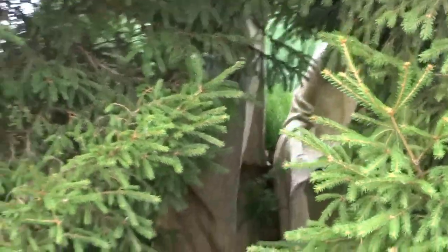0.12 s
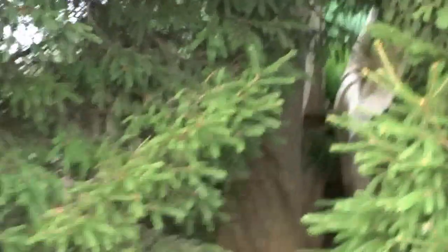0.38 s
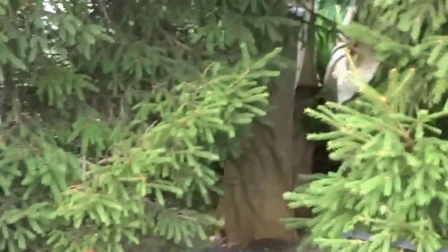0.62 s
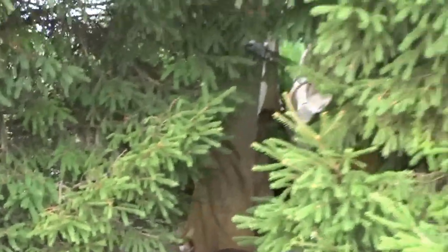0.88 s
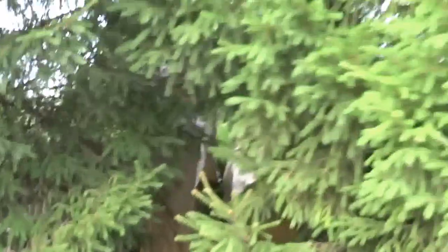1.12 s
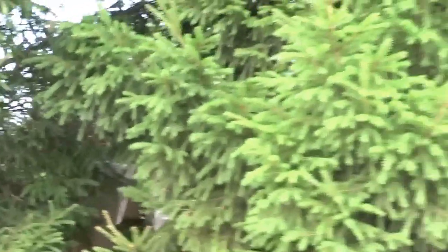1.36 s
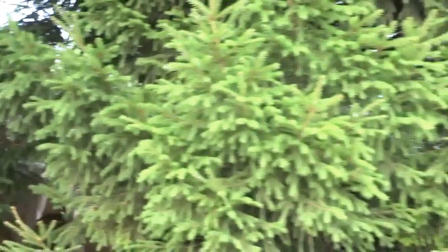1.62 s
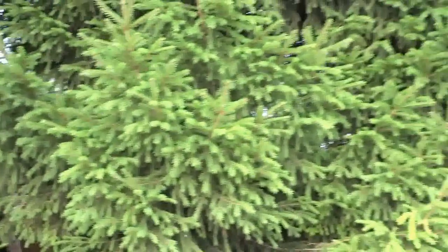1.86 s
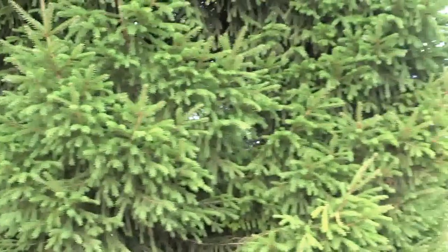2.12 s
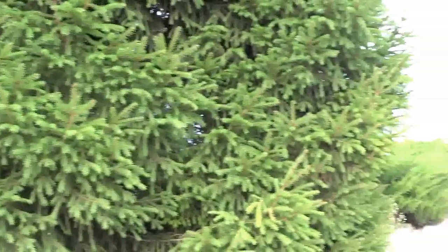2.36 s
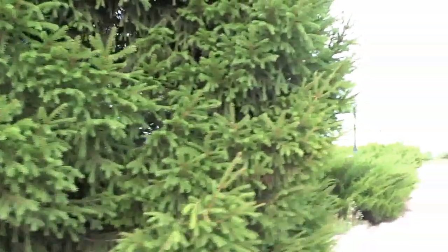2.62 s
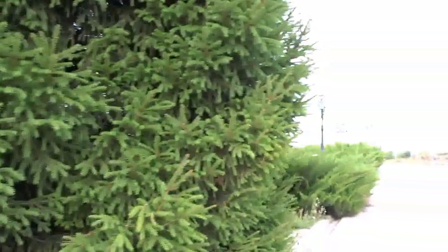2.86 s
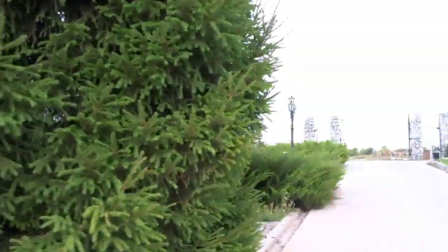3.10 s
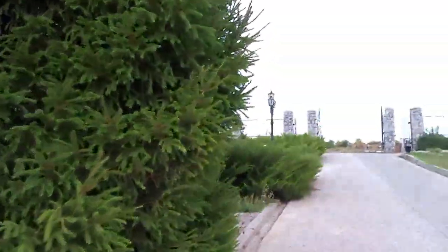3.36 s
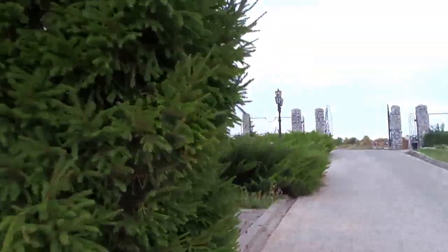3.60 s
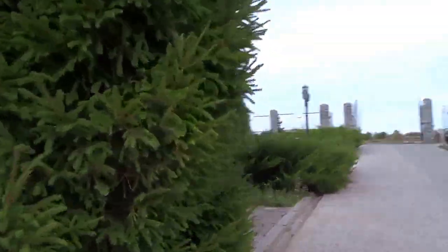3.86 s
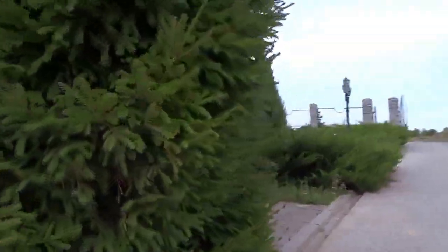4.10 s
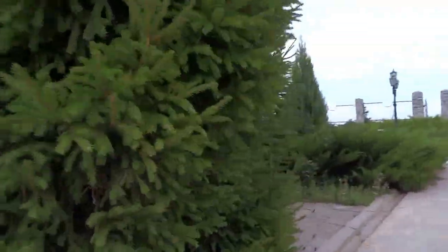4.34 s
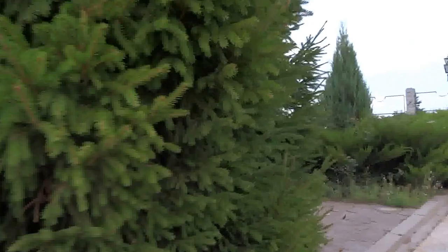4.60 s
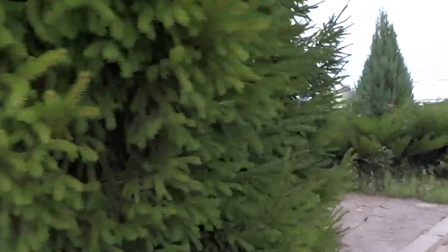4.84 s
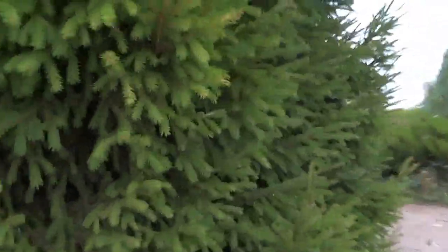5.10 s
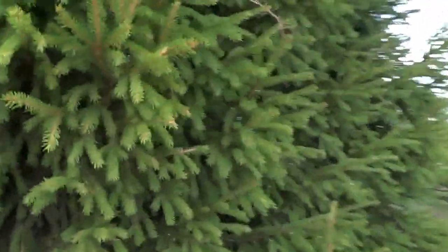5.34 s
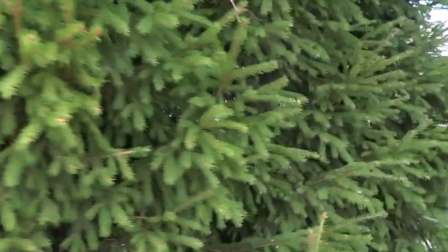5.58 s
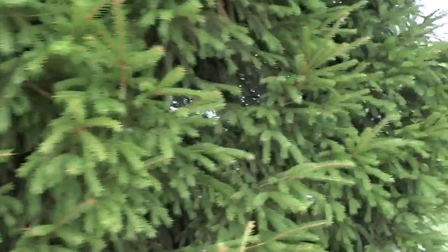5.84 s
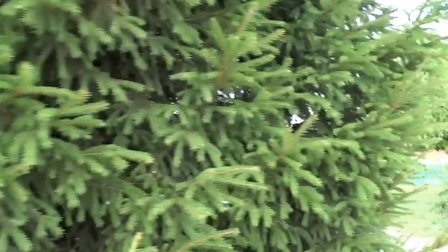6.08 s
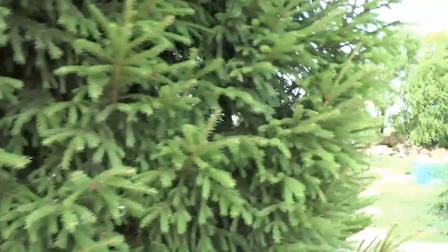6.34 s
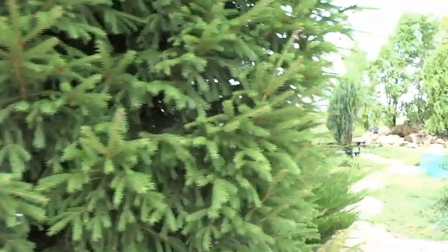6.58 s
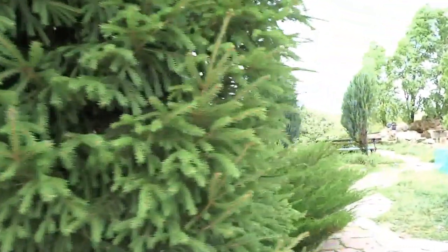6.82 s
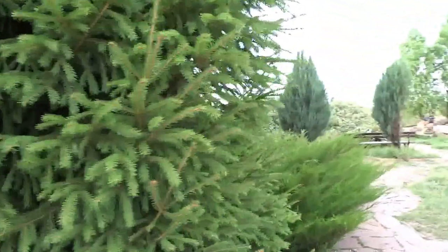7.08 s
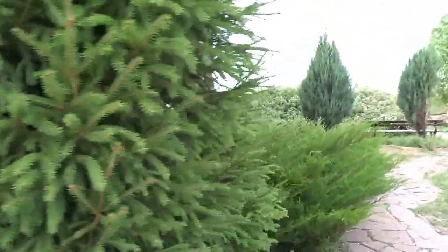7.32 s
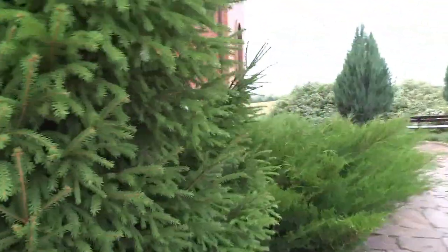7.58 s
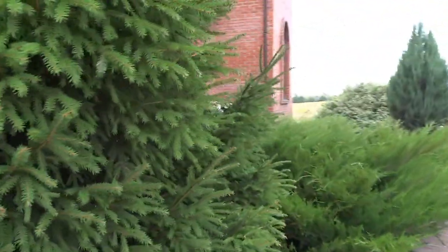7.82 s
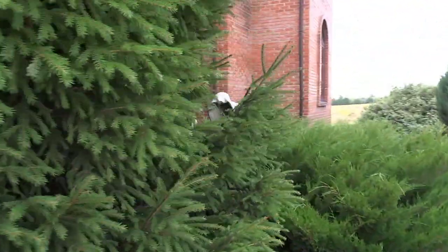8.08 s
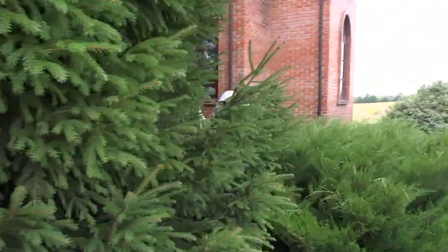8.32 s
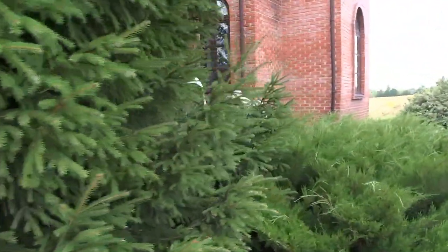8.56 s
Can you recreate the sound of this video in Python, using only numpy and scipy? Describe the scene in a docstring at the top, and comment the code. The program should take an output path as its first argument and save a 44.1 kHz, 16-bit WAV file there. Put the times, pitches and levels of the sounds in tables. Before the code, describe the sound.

Bursts of crisp needle rustling, scraping twigs and small wooden snaps, with lively sparrow chirping around and a barely audible distant engine hum.

```python
"""Among spruce trees, someone pushes past the branches with a small camera in hand.
Needles swish and twigs scrape as filtered noise and grains; boughs creak low; snaps are short ringing bursts.
Sparrows chatter as gliding tones, some near and clear, the rest a blur of overlapping notes.
Light wind buffets the microphone, mostly at first, as swells of low noise.
A far engine hums as three faint wavering tones."""
import sys
import numpy as np
from scipy import signal
from scipy.fft import rfft, irfft, next_fast_len
from scipy.io import wavfile
from scipy.ndimage import uniform_filter1d

SR = 44100
rng = np.random.default_rng(int(sys.argv[2]) if len(sys.argv) > 2 else 0)


def materialize(psi):
    """Save the field psi as 16-bit PCM at rate SR to the path in sys.argv[1].

    A 1-D psi becomes a single channel; in a 2-D psi each row is a channel.
    """
    bounded = np.clip(np.atleast_2d(psi).T, -1, 1)
    quanta = np.round(bounded * 32767).astype(np.int16)
    wavfile.write(sys.argv[1], SR, quanta)


def volts_from_db(level):
    """Convert decibel levels to linear amplitude ratios."""
    exponent = np.asarray(level, float) / 20
    return 10 ** exponent


N = 383095
T = np.arange(N) / SR


def on_log(table, hz, axis=1):
    """Reads a column of a table of frequencies on a log-frequency axis."""
    table = np.array(table, float)
    return np.interp(np.log(np.maximum(hz, 1)), np.log(table[:, 0]), table[:, axis])


def colour(x, table):
    """Causal filter with the table's spectrum, built from the cepstrum of the log gain."""
    gain_db = on_log(table, np.linspace(0, SR / 2, 1025))
    cepstrum = irfft(np.log(volts_from_db(gain_db)))
    # fold the second half onto the first: minimum phase
    cepstrum[1:1024] *= 2
    cepstrum[1025:] = 0
    impulse = irfft(np.exp(rfft(cepstrum)))
    return signal.fftconvolve(x, impulse)[:N]


def band(x, lo_hz, hi_hz):
    """Band-pass with gentle slopes."""
    edges = [lo_hz, min(hi_hz, .45 * SR)]
    return signal.sosfilt(signal.butter(2, edges, "bandpass", fs=SR, output="sos"), x)


def unit(x, lo_hz, hi_hz):
    """Scales x so that the given band has rms 1."""
    return x / np.std(band(x, lo_hz, hi_hz))


def walk(rate):
    """Random levels held about 1 / rate s and slewed twice; spread near 1."""
    hold = max(int(SR / rate / 32), 2)  # in steps of 32 samples
    slow = np.repeat(rng.standard_normal(N // 32 // hold + 2), hold)
    slow = uniform_filter1d(uniform_filter1d(slow, hold), hold)
    return 1.49 * np.interp(np.arange(N) / 32, np.arange(len(slow)), slow)


def swells(rows, steady_db, axis=2):
    """Level in dB of a steady bed plus swells that climb to a peak and fall away; powers add."""
    rise_share = 0.8  # a swell rises in this share of the time it takes to fall
    roundness = 0.99  # 1 = pointed peak with long skirts, 2 = dome with abrupt ends
    rows, t = np.array(rows, float), T[::32]
    late = t - rows[:, :1]
    distance = np.where(late > 0, late, -late / rise_share)
    fall_s = np.maximum(rows[:, 1:2] / 1000, .01)
    db = rows[:, axis, None] - 10 * (distance / fall_s) ** roundness
    power = volts_from_db(2 * (steady_db + 0 * T))[::32] + volts_from_db(2 * db).sum(axis=0)
    return np.interp(T, t, 10 * np.log10(power))


def grains(rate, spread_db, tail_s):
    """Noise in short bursts: sudden starts of very uneven size that die away."""
    size = volts_from_db(spread_db * np.minimum(rng.exponential(size=N), 3.3))
    starts = (rng.random(N) < rate / SR) * size
    envelope = signal.lfilter([1], [1, -np.exp(-1 / (tail_s * SR))], starts)
    return envelope * rng.standard_normal(N)


def flutter(x, depth_db, rate):
    """Each half octave wavers on its own, as different sprigs bend and let go."""
    size = 2 * next_fast_len(N // 2 + 1)
    spec = rfft(x, size)
    half_octave = np.clip(2 * np.log2(np.fft.rfftfreq(size, 1 / SR) + 1), 15, 28)
    out = np.zeros(N)
    for k in range(15, 29):
        share = np.clip(1 - abs(half_octave - k), 0, 1)
        out += irfft(spec * share)[:N] * volts_from_db(depth_db * walk(rate))
    return out


def add(out, s, x):
    """Mixes x into out at time s."""
    i = min(max(int(s * SR), 0), N)
    out[i:i + len(x)] += x[:N - i]


def echoes(x, t60, wet_db):
    """Trunks and walls scatter the sound into a short diffuse tail."""
    t = np.arange(int(.4 * SR)) / SR
    tail = rng.standard_normal(len(t)) * np.exp(-np.log(1000) * t / t60) * (t > .004)
    return x + volts_from_db(wet_db) * signal.fftconvolve(x, tail / np.linalg.norm(tail))[:N]


# how firmly the walker leans into the foliage and turns the camera:
# [t/s, level/dB added to the steady rustle, left minus right level/dB]
LEANING = [(0, 1, -.4), (.6, -1, 0), (1.1, 2.5, -.7), (2.0, -1.5, 1), (2.8, 4.5, -0.8), (3.3, 2, 0.6),
           (4.15, -0.5, 0.7), (4.6, 1, -0.3), (5.5, -2, 0.4), (6.2, -0.5, 0.2), (7.3, -0.5, 0.3),
           (7.9, -3, -0.4), (8.68, -1.5, -1.5)]


def leaning():
    """The walker's moving body: rustle level and left-right balance, both in dB over time."""
    t, lean_db, turn_db = np.transpose(LEANING)
    return np.interp(T, t, lean_db), np.interp(T, t, turn_db)


# spectrum of needles: [f/Hz, level/dB]
NEEDLE_SPECTRUM = [(1500, -43), (2200, -14), (3500, -6), (4400, -12.5), (5500, -7), (6400, -2.5),
                   (7500, -1.5), (8600, -5.5), (10200, -17), (12800, -36), (15700, -41)]
# spectrum of twigs: [f/Hz, level/dB]
TWIG_SPECTRUM = [(350, -33), (600, -8), (1040, -4.5), (1300, 2), (1550, -3), (2100, -1.5), (3300, 2),
                 (5000, -9), (7000, -22), (12000, -114)]
# branches brushed aside, before the strokes waver: [t/s of the peak, time/ms to fall 10 dB,
# needle swish level/dB at 6.5-12 kHz before extra treble, twig scrape level/dB at 0.6-2.2 kHz]
BRUSHED_BRANCHES = [(.11, 138, -42, -78), (.24, 45, -43.5, -78), (1.0, 123, -42.5, -88),
                    (2.3, 70, -68, -84), (2.52, 90, -38.5, -75), (2.665, 52, -32, -46.5),
                    (2.93, 7, -40.5, -45), (3.022, 13.5, -29, -29), (3.06, 84, -44, -41),
                    (4.42, 134, -47, -62), (4.56, 47, -34.5, -50), (4.67, 79, -41, -51),
                    (4.78, 54, -40.5, -76), (3.75, 102, -48, -55.5), (5.03, 77, -40.5, -41.5),
                    (5.17, 69, -48, -45.5), (5.565, 14, -37, -47), (5.613, 14.5, -27.5, -25.5),
                    (5.635, 37, -33, -39), (6.41, 145, -47, -51), (6.685, 52, -43.5, -71),
                    (6.885, 8, -42, -51), (7.48, 13, -42.5, -54), (7.585, 51, -45, -46.5),
                    (7.82, 88, -49, -53.5), (8.085, 71, -41.5, -48.5), (8.26, 46, -34, -47.5),
                    (8.325, 55, -44, -48.5), (8.452, 67, -30.5, -47)]
# boughs bending: [t/s of the peak, time/ms to fall 10 dB, creak level/dB]
BENDING_BOUGHS = [(2.67, 298, -57), (2.988, 44, -39.5), (3.15, 319, -55.5), (5.04, 106, -57.5),
                  (5.19, 200, -59), (5.618, 70, -66.5), (5.9, 202, -63.5), (6.41, 89, -53.5),
                  (8.28, 46, -58), (8.45, 340, -61)]


def branches(lean_db):
    """Thousands of needles flick past the sleeve, brighter when loud; twigs rub and tick, boughs creak low."""
    swish_db = swells(BRUSHED_BRANCHES, -54.5 + lean_db)
    scrape_db = swells(BRUSHED_BRANCHES, -56 + lean_db, axis=3)
    creak_db = swells(BENDING_BOUGHS, -72 + lean_db)

    flicks = grains(6000, 2, .0018) + .9 * grains(90, 3.5, .0005)
    needles = unit(flutter(colour(flicks, NEEDLE_SPECTRUM), 2.8, 16), 6500, 12000)
    treble_db = np.minimum(.9 * (swish_db + 46), 6)
    needles = needles + volts_from_db(treble_db) * band(needles, 10500, 15500)

    ticks = grains(150, 3.2, .001)
    rubbing = rng.standard_normal(N) + .9 * ticks / np.std(ticks)
    twigs = unit(flutter(colour(rubbing, TWIG_SPECTRUM), 2.4, 12), 600, 2200)

    boughs = band(band(grains(300, 5.5, 0.0099), 295, 710), 120, 810)
    strokes = volts_from_db(1.9 * walk(11))  # sprigs catch and release one after another
    brushing = strokes * (volts_from_db(swish_db) * needles + volts_from_db(scrape_db) * twigs)
    return brushing + volts_from_db(creak_db) * boughs / np.std(boughs)


# lines of the engine hum: [f/Hz, level/dB before wavering and fading]
HUM_LINES = [(134.6, -89.5), (186, -87), (274.5, -91)]


def hum():
    """A far engine: faint low lines that waver and sink away towards the end."""
    fading_db = -5 * np.maximum(T - 6.3, 0)
    out = np.zeros(N)
    for hz, db in HUM_LINES:
        level = volts_from_db(db + fading_db + 2.0 * walk(0.99))
        cycles = hz * np.cumsum(1 + 0.0045 * walk(5.6)) / SR
        out += level * np.sqrt(2) * np.sin(2 * np.pi * cycles)
    return out


def chirp(length, hz, rough, chance):
    """One syrinx note gliding through three pitches; a fast quaver of pitch and level makes it grainy."""
    u = np.linspace(0, 1, int(length * SR))
    bend_hz = 4 * hz[1] - 2 * hz[0] - 2 * hz[2]  # puts hz[1] at the middle
    pitch = hz[0] * (1 - u) + hz[2] * u + bend_hz * u * (1 - u)
    quaver = np.resize(uniform_filter1d(np.repeat(chance, 48), 36), len(u) + 48)
    phase = 2 * np.pi * np.cumsum(pitch + 150 * rough * quaver[:len(u)]) / SR
    grain = volts_from_db(4.2 * rough * quaver[::-1][:len(u)])
    return abs(np.sin(np.pi * u)) ** .6 * grain * (np.sin(phase) + .04 * np.sin(2 * phase))


# bouts of far chatter: [t/s of the peak, time/ms to fall 10 dB, level/dB before wavering]
FAR_BOUTS = [(.1, 111, -39), (.28, 95, -39), (1.03, 322, -42), (1.65, 210, -44.5), (2.15, 322, -44),
             (4.54, 253, -46.5), (6.37, 406, -45.5), (6.8, 350, -44.5), (7.2, 257, -46.5), (8.05, 563, -46),
             (8.46, 171, -42)]
# near notes that glide straight: [t/s, length/s, start f/Hz, end f/Hz, level/dB]
GLIDING_NOTES = [(0.02, 0.046, 5830, 5280, -39), (0.076, 0.079, 4320, 5420, -35),
                 (0.123, 0.05, 3440, 4300, -41.5), (0.225, 0.027, 5500, 5070, -34.5),
                 (0.245, 0.052, 4600, 3700, -36.5), (0.372, 0.084, 4630, 4460, -44),
                 (0.426, 0.045, 5030, 4810, -35), (0.46, 0.023, 4700, 3980, -37),
                 (0.485, 0.048, 3480, 3720, -41.5), (0.866, 0.03, 3520, 2960, -38.5),
                 (0.914, 0.038, 3600, 2840, -41), (1.035, 0.14, 4710, 5110, -39),
                 (1.046, 0.03, 3110, 3600, -33), (1.147, 0.06, 4730, 2970, -38),
                 (1.254, 0.093, 3280, 2780, -50), (1.398, 0.074, 3060, 3430, -40),
                 (1.539, 0.042, 5650, 3820, -42), (1.573, 0.072, 3960, 3340, -43),
                 (1.66, 0.035, 5620, 5700, -38), (1.66, 0.039, 4400, 4500, -43),
                 (1.79, 0.086, 4270, 3360, -40.5), (2.05, 0.041, 3320, 3220, -40.5),
                 (2.093, 0.031, 3970, 4750, -43.5), (2.107, 0.059, 3410, 3330, -39.5),
                 (2.188, 0.07, 4320, 4540, -40.5), (2.501, 0.075, 3040, 3810, -40),
                 (2.586, 0.16, 3680, 3455, -40.5), (2.922, 0.022, 7560, 7440, -41),
                 (3.432, 0.081, 4970, 4400, -45), (3.49, 0.051, 3560, 3640, -42.5),
                 (3.655, 0.037, 6100, 5280, -44.5), (3.717, 0.039, 3580, 3930, -39.5),
                 (4.237, 0.055, 7300, 7540, -50), (4.377, .03, 9200, 7450, -56),
                 (4.173, 0.036, 4000, 3740, -41.5), (4.461, 0.026, 3900, 3500, -38),
                 (0.545, .05, 2520, 2445, -48), (2.004, 0.065, 4600, 5930, -51),
                 (5.069, 0.05, 3500, 3150, -40.5), (4.422, 0.028, 4940, 5060, -38.5),
                 (4.924, .07, 4400, 4090, -43.5), (4.958, 0.11, 3700, 3000, -44),
                 (5.247, 0.12, 4550, 3910, -47), (5.287, 0.045, 3650, 3100, -51),
                 (5.362, 0.057, 7200, 4250, -53), (5.454, 0.02, 3130, 5170, -45),
                 (6.187, 0.019, 3110, 5150, -41), (5.734, 0.048, 4340, 4170, -36.5),
                 (5.774, 0.18, 4350, 3860, -54), (6.017, 0.16, 3940, 4140, -46.5),
                 (6.343, 0.033, 5920, 3710, -41), (6.459, 0.043, 9200, 6600, -52),
                 (6.766, 0.058, 4500, 3600, -43.5), (6.87, .07, 4100, 3810, -47),
                 (6.971, 0.06, 4200, 2950, -41.5), (7.088, 0.074, 4400, 3010, -47),
                 (7.942, 0.024, 5200, 5050, -42), (7.936, 0.032, 6400, 6030, -42),
                 (7.933, .03, 7800, 7400, -47)]
# near notes that arch up and back: [t/s, length/s, foot f/Hz, top f/Hz, level/dB]
ARCHING_NOTES = [(0.057, 0.036, 4830, 5900, -34.5), (0.268, 0.048, 3050, 3500, -32),
                 (0.834, 0.035, 4450, 5580, -32), (1.879, 0.047, 3800, 4400, -40),
                 (4.508, 0.029, 3500, 3750, -36), (3.432, 0.061, 3980, 4240, -44.5),
                 (4.441, 0.032, 3590, 3800, -38), (5.946, 0.075, 3610, 4390, -44.5),
                 (6.229, .022, 4680, 6160, -43), (6.419, 0.048, 9300, 9760, -46.5),
                 (6.741, 0.041, 3910, 5220, -40), (7.03, 0.052, 3500, 4360, -42.5),
                 (7.965, 0.029, 3800, 5420, -34.5)]


def sparrows():
    """Near notes stand out, the highest and steepest smoother; many far notes overlap into a tangle."""
    near, far = np.zeros(N), np.zeros(N)
    sag = 0.0433  # an arch starts this share above its foot and ends as far below
    notes = [(s, length, (a, (a + b) / 2, b), db) for s, length, a, b, db in GLIDING_NOTES]
    notes += [(s, length, (foot * (1 + sag), top, foot * (1 - sag)), db)
              for s, length, foot, top, db in ARCHING_NOTES]
    for (s, length, hz, db), c in zip(notes, rng.standard_normal((len(notes), 160))):
        smooth = hz[1] > 6000 or abs(hz[2] - hz[0]) / length > 40000  # Hz, Hz per s
        add(near, s, volts_from_db(db) * chirp(length, hz, .3 if smooth else .95, c))

    # a thin, very high twitter around 12 kHz
    for s, c in zip(np.arange(4.22, 4.83, .04), rng.standard_normal((20, 160))):
        add(near, s, volts_from_db(-61 + 2 * c[4]) * chirp(.026, 12000 * np.exp(.06 * c[:3]), .5, c))

    # far chatter: 200 notes a second
    for s, c in zip(np.arange(0, N / SR, 1 / 200), rng.standard_normal((1750, 160))):
        hz = 2500 + 1500 * np.exp(.38 * c[0] + .22 * c[1:4])
        length = np.clip(.016 + .006 * c[6], .008, .1)
        add(far, s + .01 * abs(c[4]), volts_from_db(2.8 * c[5]) * chirp(length, hz, .55, c))
    far = echoes(far, 0.17, -5.5)
    far_level = volts_from_db(swells(FAR_BOUTS, -57.5) + 1.8 * walk(11))
    return echoes(near, .15, -8.5) + far_level * far / np.std(far)


# puffs of wind on the ports, before wavering:
# [t/s of the peak, time/ms to fall 10 dB, level/dB at 50-260 Hz of the part alike in both ports]
WIND_PUFFS = [(.28, 28, -59), (.39, 40, -61.5), (.59, 101, -57), (.76, 195, -64), (1.12, 45, -62),
              (1.7, 88, -55), (1.86, 42, -61), (2.0, 96, -51.5), (2.14, 52, -49.5), (2.28, 16, -46.5),
              (2.36, 38, -55), (2.62, 208, -69), (5.06, 26, -60), (5.14, 50, -69), (6.66, 18, -65)]
# spectrum of the buffeting: [f/Hz, level/dB]
BUFFET_SPECTRUM = [(20, -31), (60, 0), (125, 4), (220, 4), (450, -3.5), (800, -5.5), (1300, -8),
                   (3000, -105)]


def wind():
    """Eddies thump the ports one by one, partly alike left and right."""
    puffs = volts_from_db(swells(WIND_PUFFS, -88.5) + 2.6 * walk(60))
    mid = unit(colour(rng.standard_normal(N), BUFFET_SPECTRUM), 50, 260)
    side = unit(colour(rng.standard_normal(N), BUFFET_SPECTRUM), 50, 260)
    return puffs * (mid + 0.78 * band(side, 160, 1400) * np.array([[1], [-1]]))


# snapping twigs, before the final band-pass and echoes:
# [t/s, ring peak level/dB, ring f/Hz, tick peak level/dB relative to the ring]
TWIG_SNAPS = [(0.753, -27.5, 2320, -30), (1.042, -23, 2830, -29), (1.227, -22.5, 1480, -4),
              (1.377, -28, 3040, -18), (1.481, -18, 2440, -24), (1.929, -34, 2370, -20),
              (2.229, -17.5, 2670, -27), (2.397, -28.5, 2850, 8.5), (2.481, -26, 3000, -14),
              (2.503, -26, 2980, 5), (2.966, -26, 2370, -19), (2.979, -24, 2180, -9),
              (2.992, -25, 2390, -9), (3.015, -11.5, 1160, -16), (3.021, -14.5, 1440, -6),
              (3.036, -22, 2190, -2), (3.081, -28, 2400, -1), (3.157, -26.5, 1400, -10),
              (3.194, -15, 1550, -14), (3.295, -20, 1750, -30), (3.327, -27.5, 2930, -24),
              (3.343, -25.5, 2650, -25), (3.492, -29, 1280, -0.5), (3.669, -25.5, 2150, -22),
              (3.836, -27, 1300, -25), (4.066, -27, 1660, -33), (4.313, -30.5, 2780, -20),
              (4.413, -35, 2920, 3), (4.502, -20.5, 3030, -25), (4.687, -24.5, 1280, -17),
              (5.015, -13.5, 2280, -17), (5.064, -24, 2600, 2.5), (5.247, -28, 3630, -4),
              (5.38, -28.5, 1960, -30), (5.421, -23, 1720, -29), (5.559, -28, 3000, 10.5),
              (5.594, -36, 1700, 4), (5.603, -11, 2120, -30), (5.614, -25, 2600, -33),
              (5.634, -16, 1500, -20), (5.647, -16, 1350, -20), (6.281, -21, 2920, -6),
              (6.384, -25, 2760, -10), (6.901, -24.5, 1450, -10), (7.118, -26.5, 2830, -21),
              (7.333, -28, 3330, -25), (7.135, -26.5, 2880, -6), (7.446, -27, 1410, -27),
              (7.477, -25.5, 1470, -4), (7.567, -33, 1820, -3), (7.69, -24, 1350, -27),
              (7.874, -33, 2300, -17), (8.06, -24, 3020, -21), (8.086, -31, 2060, -15),
              (8.127, -22.5, 1960, -25)]


def snaps():
    """Each snap is a click and spiky noise dying within milliseconds: a wooden ring and a bright tick."""
    out, t = np.zeros(N), np.arange(500) / SR
    chance = rng.standard_normal((len(TWIG_SNAPS), len(t)))
    for (s, db, hz, bright_db), c in zip(TWIG_SNAPS, chance):
        crack = c * abs(c) * np.exp(-t / 0.0022) + 9 * (t == 0)
        ring = band(crack, hz / 1.24, hz * 1.24) + .42 * band(crack, 1500, 6500)
        tick = band(crack, 6100, 8400)
        add(out, s, volts_from_db(db) * (ring / abs(ring).max() + volts_from_db(bright_db) * tick / abs(tick).max()))
    return echoes(band(band(out, 700, 10500), 500, 10500), .04, -14)


# step between the ports: [f/Hz, left minus right level/dB, left leads by phase/rad]
PORT_STEP = [(100, 0, 0.), (300, 0.8, 0), (1280, 2, 0.41), (3500, 3, 0.27), (8350, 0.4, 0.045),
             (10500, 1.5, 0.58)]
# scattered sound, opposite in the two ports: [f/Hz, level/dB]
PORT_SCATTER = [(100, -46), (300, -29), (700, -10.5), (1500, -21.5), (7000, -48), (10000, -8.5),
                (15000, -23)]


def ports(x):
    """Two close ports hear the same sound with a small level and phase step, plus a little scattered sound."""
    size = next_fast_len(N)
    spec, hz = rfft(x, size), np.fft.rfftfreq(size, 1 / SR)
    # half the step goes to each side
    step = volts_from_db(on_log(PORT_STEP, hz) / 2) * np.exp(.5j * on_log(PORT_STEP, hz, axis=2))
    paths = rng.standard_normal(3000) * np.exp(-np.arange(3000) / 900)
    scatter = rfft(paths / np.linalg.norm(paths), size) * volts_from_db(on_log(PORT_SCATTER, hz))
    left = irfft(spec * (step + scatter))[:N]
    right = irfft(spec * (1 / step - scatter))[:N]
    return np.array([left, right])


def scene():
    """Everything nearby, as the two ports hear it."""
    lean_db, turn_db = leaning()
    foliage = band(branches(lean_db), 140, 19000)
    around = ports(foliage + hum() + sparrows() + snaps())
    balance = volts_from_db(np.array([turn_db, -turn_db]) / 2)
    return around * balance + wind()


def roll_off(x):
    """The treble ends steeply here."""
    return signal.sosfilt(signal.butter(12, 15780, fs=SR, output="sos"), x)


def record(dry):
    """Takes the finished stereo mix into the camera."""
    return roll_off(dry)


dry = scene()
out = record(dry)
materialize(out)
```